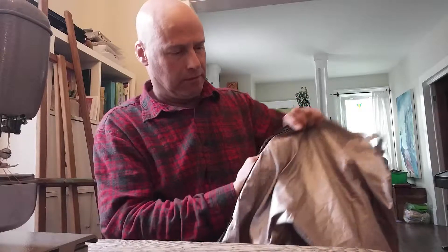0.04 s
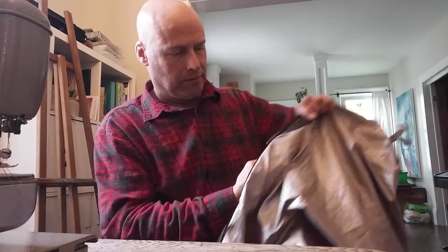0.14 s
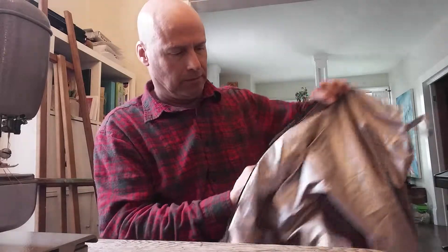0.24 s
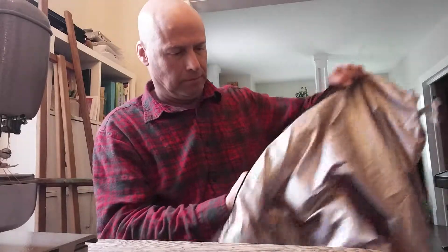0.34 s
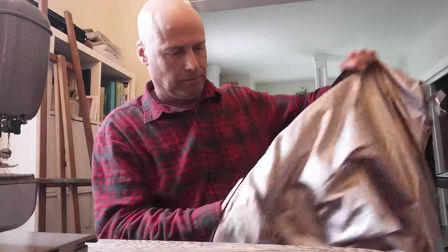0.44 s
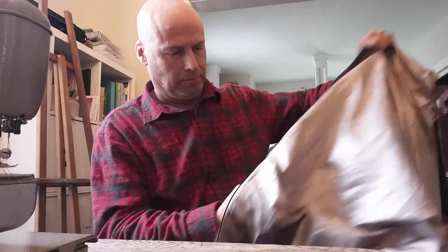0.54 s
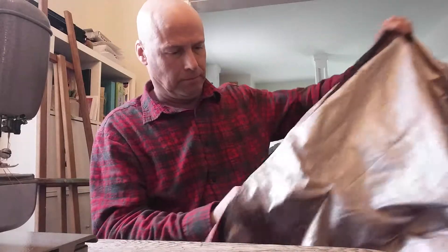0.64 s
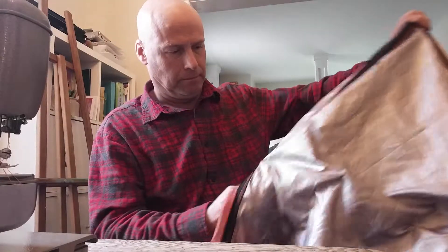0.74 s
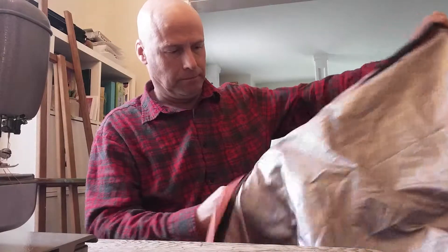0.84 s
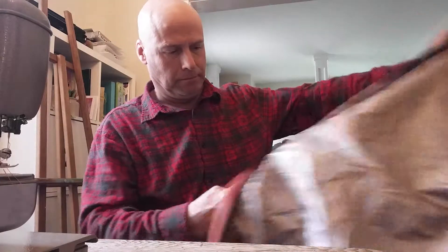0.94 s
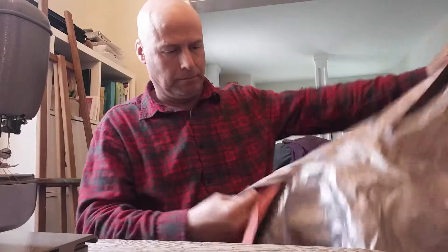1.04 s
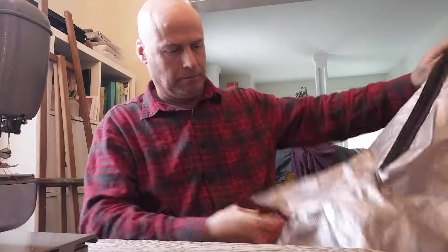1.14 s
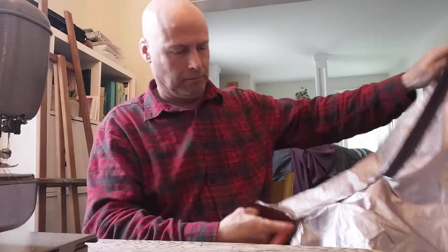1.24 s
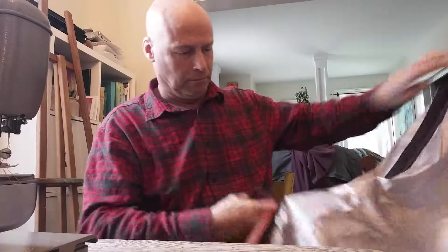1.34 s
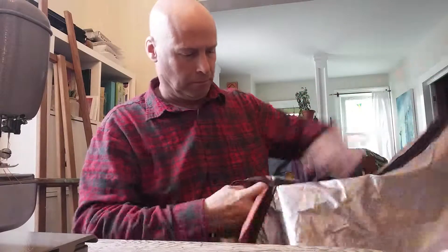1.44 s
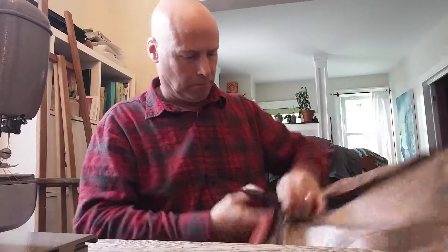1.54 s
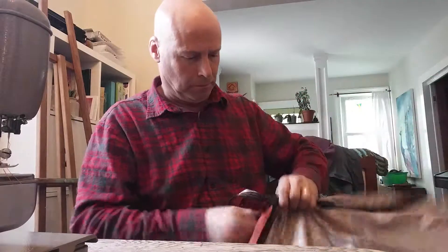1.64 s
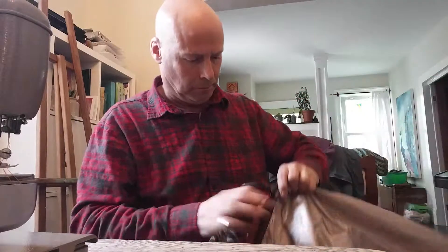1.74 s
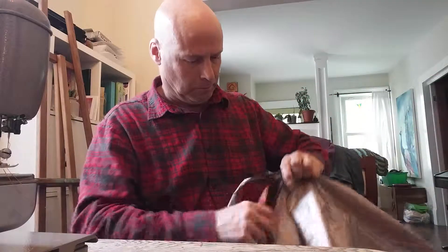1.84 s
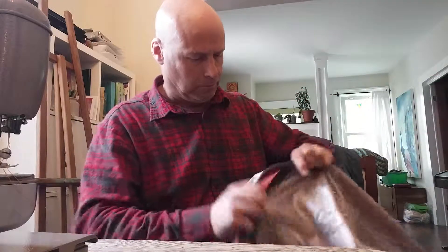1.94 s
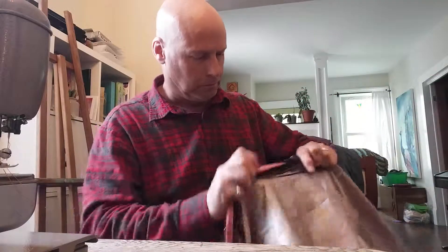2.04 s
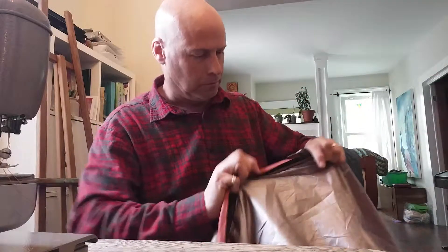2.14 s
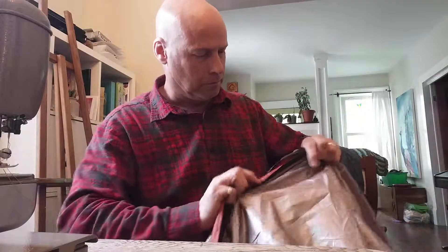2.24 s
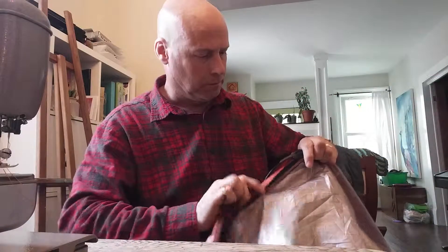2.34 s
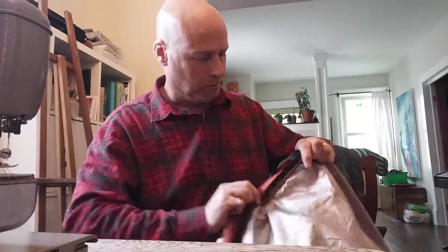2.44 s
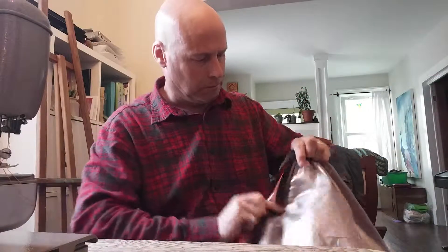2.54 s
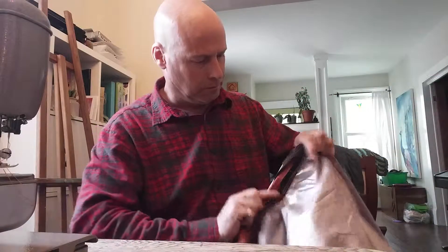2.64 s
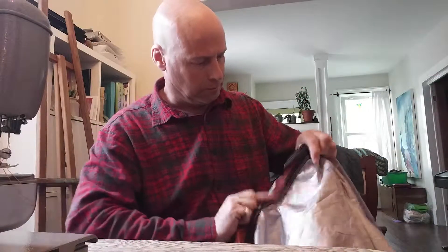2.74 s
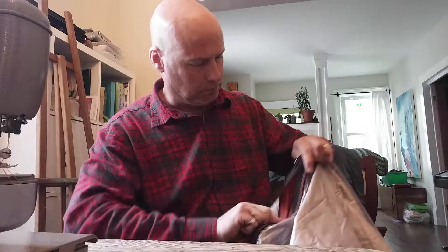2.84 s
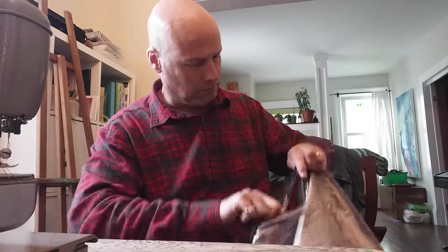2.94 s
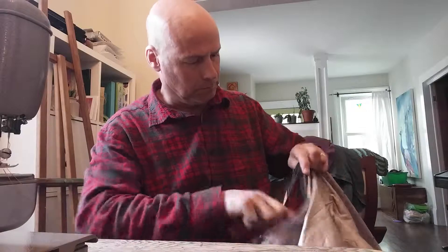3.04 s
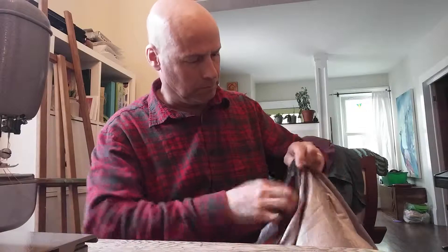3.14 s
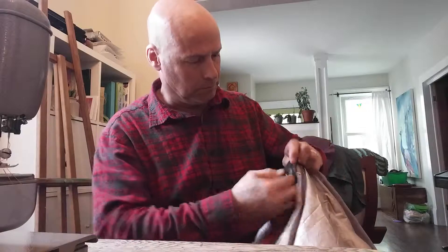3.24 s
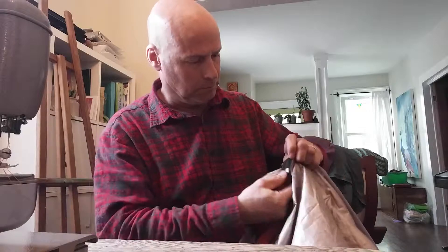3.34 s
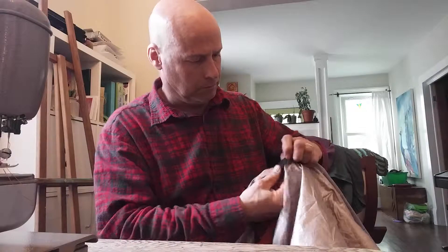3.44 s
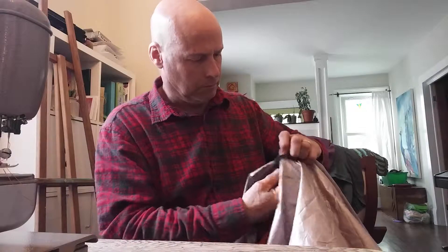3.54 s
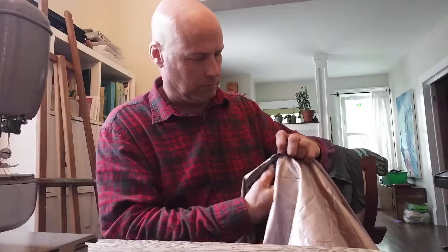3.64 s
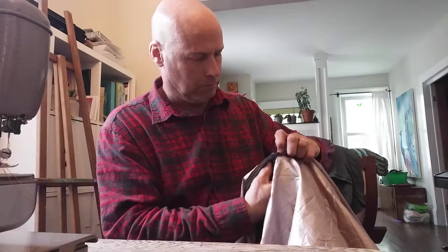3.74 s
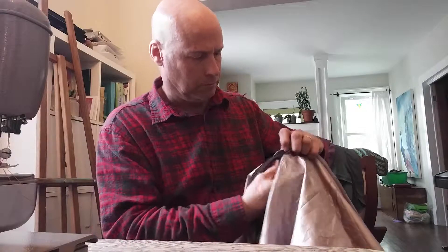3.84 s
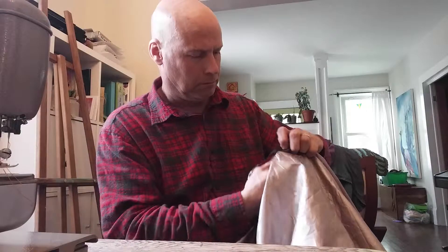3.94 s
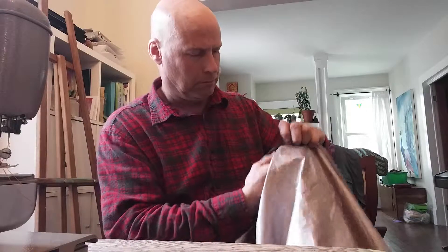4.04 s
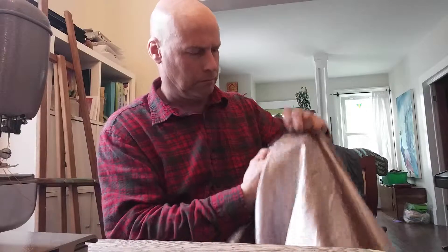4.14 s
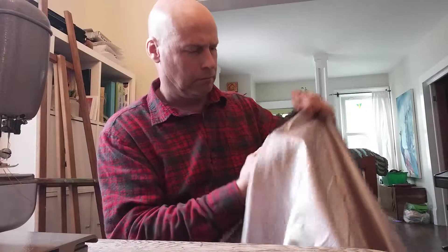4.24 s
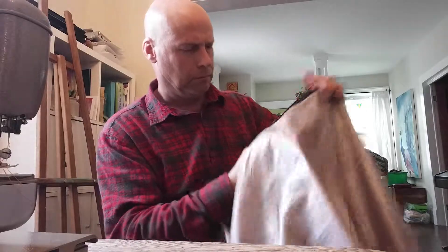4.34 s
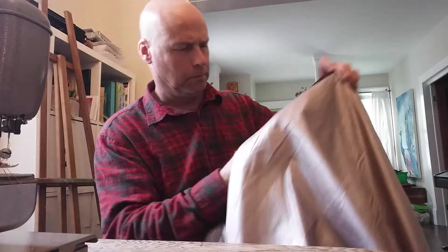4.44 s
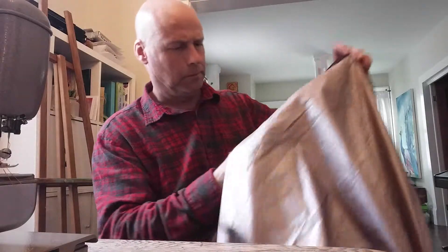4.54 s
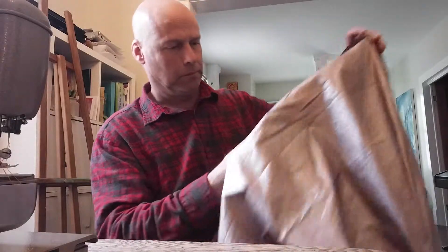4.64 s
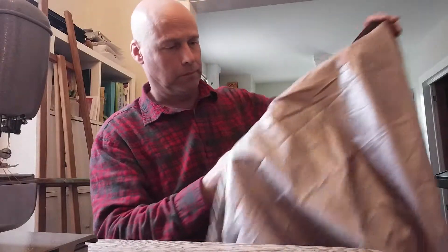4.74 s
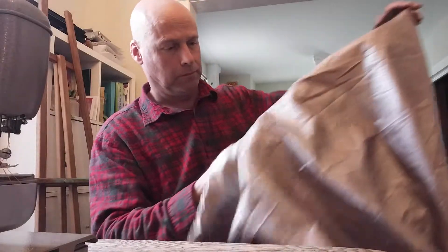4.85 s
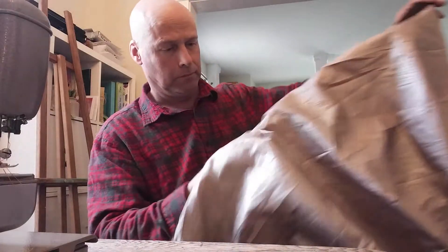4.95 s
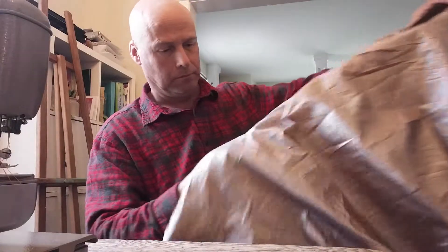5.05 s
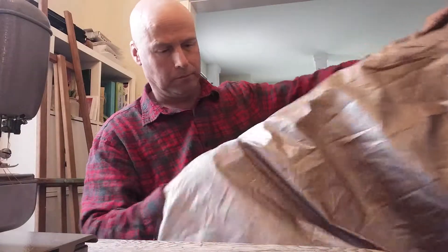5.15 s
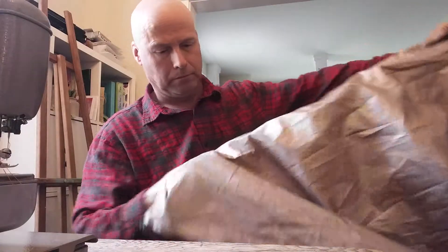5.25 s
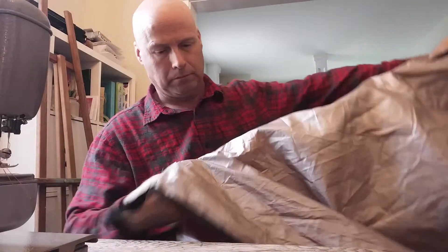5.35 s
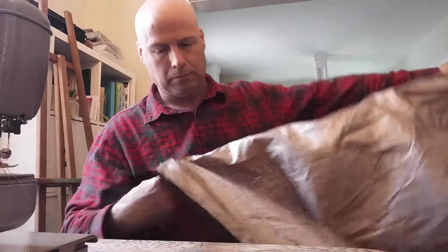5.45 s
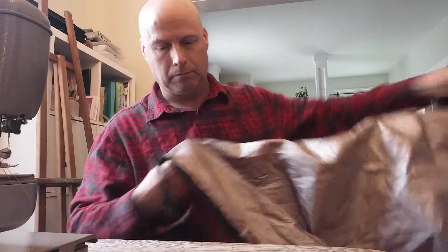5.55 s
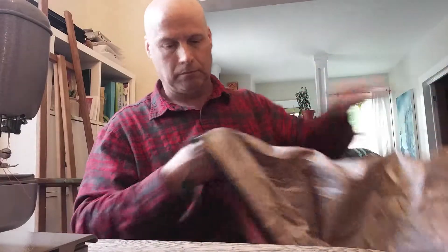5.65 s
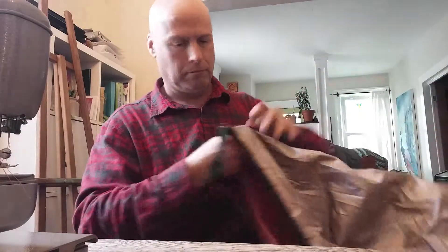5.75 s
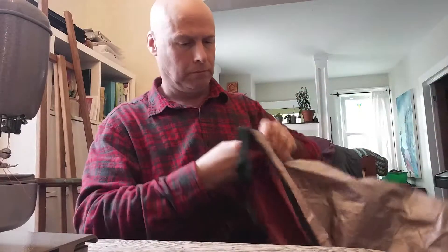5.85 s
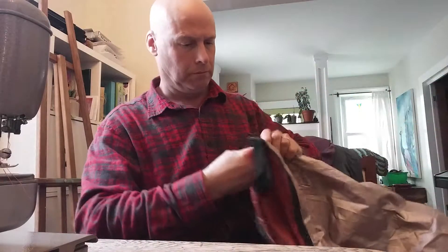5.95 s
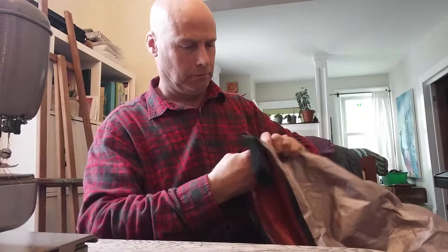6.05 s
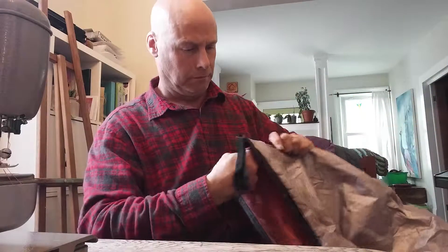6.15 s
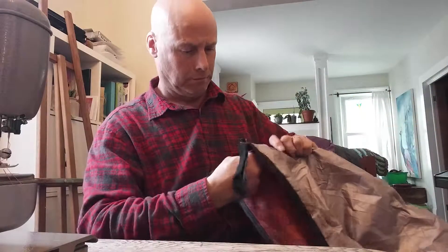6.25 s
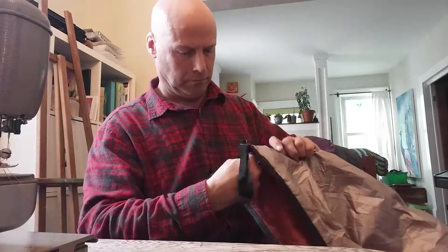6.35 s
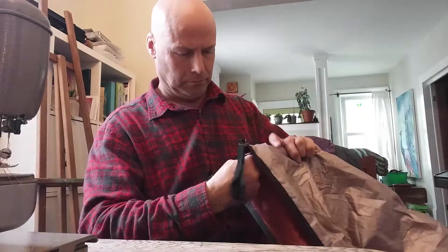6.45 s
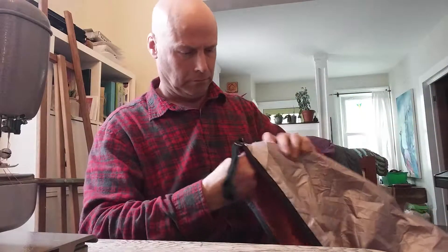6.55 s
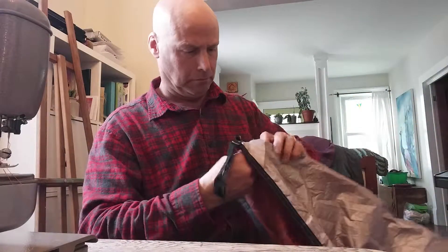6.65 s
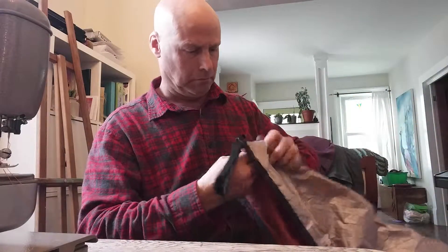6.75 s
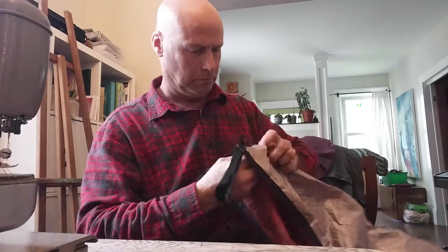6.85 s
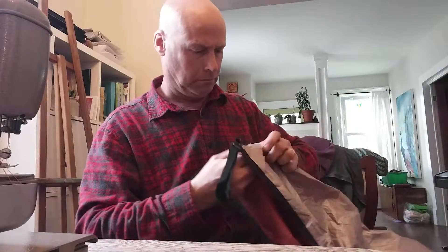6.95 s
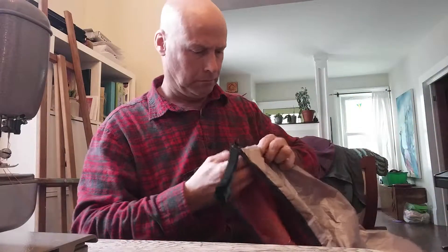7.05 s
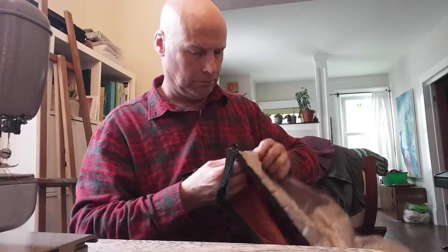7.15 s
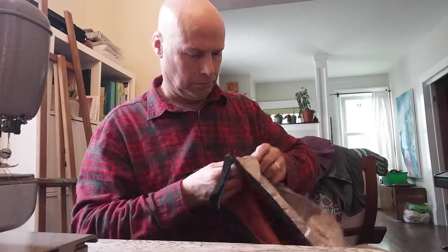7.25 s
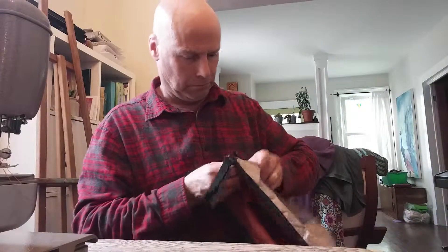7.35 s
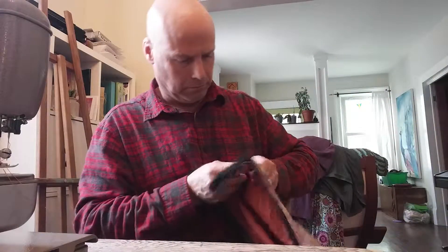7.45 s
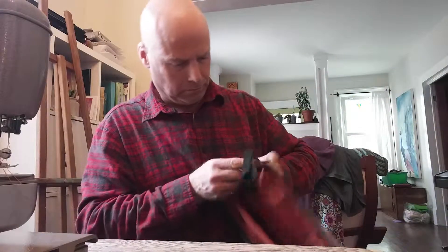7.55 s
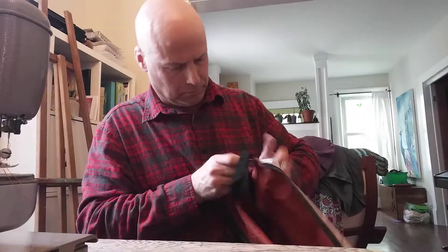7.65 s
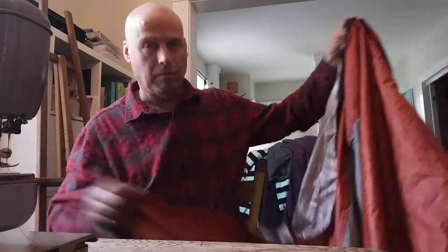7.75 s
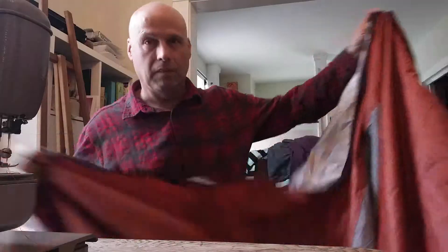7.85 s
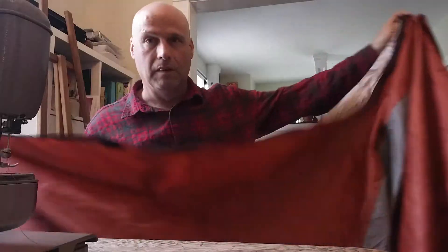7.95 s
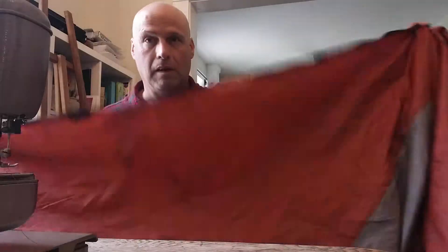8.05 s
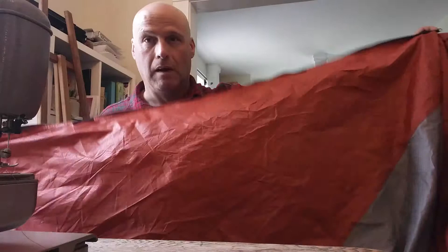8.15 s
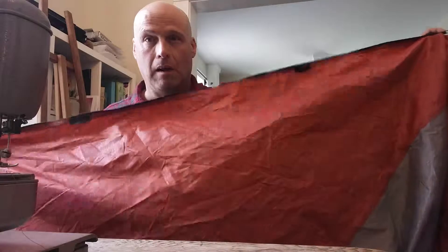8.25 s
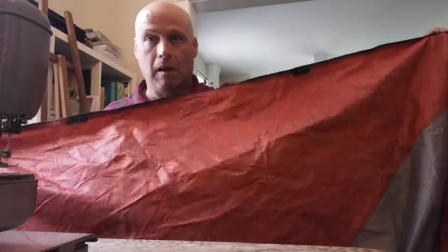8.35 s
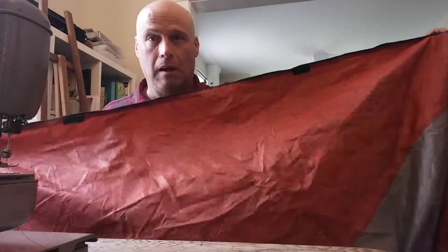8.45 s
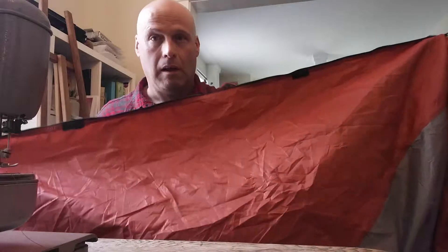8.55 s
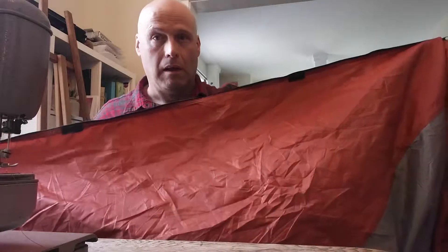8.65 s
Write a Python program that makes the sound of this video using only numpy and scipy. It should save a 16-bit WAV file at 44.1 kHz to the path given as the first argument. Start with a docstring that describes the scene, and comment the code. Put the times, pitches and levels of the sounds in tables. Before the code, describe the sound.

A zipper on a nylon tent fly is dragged twice with a raspy, wavering buzz, amid crisp rustling and flapping fabric in a quiet room.

```python
"""In a quiet room, a hand drags a zipper slider along the coil of a nylon tent fly twice.
The zipper is a harmonic buzz at the rate of passing teeth; popping creases are damped modes.
The sheet's hiss, flapping and air pushes are coloured noise, partly shared by two microphone ports.
Near the end the sound is muted for half a second and fades back in."""
import sys
import numpy as np
from scipy import signal
from scipy.fft import rfft, irfft, next_fast_len
from scipy.io import wavfile
from scipy.ndimage import uniform_filter1d

SR = 44100
rng = np.random.default_rng(int(sys.argv[2]) if len(sys.argv) > 2 else 0)


def to_wav(s):
    """Save 16-bit WAV."""
    ch = np.atleast_2d(s).T  # columns
    pcm = np.round(np.clip(ch, -1, 1) * 32767)  # PCM
    wavfile.write(sys.argv[1], SR, pcm.astype(np.int16))


def level_to_linear(level):
    """Convert decibel levels to linear amplitude factors, elementwise."""
    exponent = np.asarray(level, float) / 20
    return 10 ** exponent


N = 383669
SIZE = 2 * next_fast_len(N // 2 + 1)  # length of the long transforms [samples]


def zipper():
    """Periodic impacts: teeth pass at a rate set by hand speed; uneven teeth blur and shake the buzz."""
    # one list a pull: (time [s], teeth passed [Hz], second partial [relative dB], first over second [dB])
    pulls = [
        [(0.33, 281, -65, -5.5), (0.378, 311, -45, -9.5), (0.45, 420.7, -33, -7), (0.502, 430.5, -31.5, -10.5),
         (0.548, 388.6, -39, -4.5), (0.628, 397.7, -33.5, -14.5), (0.66, 403.5, -35.5, -3),
         (0.716, 566, -30, -5), (0.755, 565.4, -39, 6), (0.792, 472, -36.5, -2), (0.822, 448, -34.5, -7.5),
         (0.92, 317, -33.5, -17), (0.956, 345, -45, 12), (0.98, 354, -31, -26.5), (1.038, 319.8, -33.5, -10.5),
         (1.088, 448.6, -33, -10), (1.16, 371, -68, -12.5)],
        [(4.33, 159.7, -69, 8.5), (4.446, 308.2, -40, -7.5), (4.516, 371, -37.5, 0), (4.6, 395.8, -33.5, -6),
         (4.626, 444.3, -32, -17.5), (4.71, 459, -30.5, -10.5), (4.742, 479, -40, -1.5),
         (4.792, 413, -32.5, -12), (4.848, 457, -34.5, -9.5), (4.896, 412.4, -43, 4), (4.97, 473, -36.5, 3.5),
         (4.995, 523, -33.5, 1.5), (5.056, 563, -38.5, 2.5), (5.206, 433.6, -32, -6.5), (5.268, 479, -39, 4.5),
         (5.324, 423.4, -31.5, -7), (5.364, 490.7, -37.5, 6), (5.438, 414.5, -35.5, -1), (5.476, 453, -43.5, 2),
         (5.548, 470, -29.5, -2), (5.59, 321.3, -35.5, -10.5), (5.66, 255.8, -45, -2)],
    ]
    # higher partials of a tooth click: (multiple of the tooth rate, level against the second [dB])
    tooth_partials = [(3, -13), (4, -28), (5, -35)]
    # changing level of those higher partials: (time [s], added level [dB])
    upper_levels = [(0.36, -2), (0.45, 3.5), (0.55, 9), (0.64, -9), (0.74, 11), (0.82, 5), (0.95, 7.5),
                    (1.09, 1), (4.45, 6), (4.62, -3), (4.75, 0), (4.85, -5.5), (4.98, -3.5), (5.06, 6.5),
                    (5.2, 5.5), (5.3, -4), (5.42, 7.5), (5.58, -2.5)]
    # thin squeak at the sixth partial as the second pull gathers speed: (time [s], relative level [dB])
    squeak_levels = [(4.34, -59), (4.38, -58), (4.46, -49.5), (4.52, -46.5), (4.55, -60), (4.59, -60)]
    t = np.arange(N) / SR
    rows = np.vstack(pulls)
    rate_hz, level_db, first_db = (np.interp(t, rows[:, 0], rows[:, k]) for k in range(1, 4))
    wobble = evened(uniform_filter1d(rng.standard_normal(N), size=300))
    turns = np.cumsum(rate_hz * (1 + .016 * wobble)) / SR  # teeth passed so far
    upper_db = np.interp(t, *np.transpose(upper_levels))
    partials = [(1, level_db + first_db), (2, level_db)]
    partials += [(round(k), level_db + upper_db + db) for k, db in tooth_partials]
    buzz = np.zeros(N)
    for k, db in partials:
        # the slower flutter deepens with the partial number
        level = level_to_linear(db) * flutter(0.0052, 2.0) * flutter(.02, k)
        buzz += level * np.cos(2 * np.pi * k * turns)
    squeak_db = np.interp(t, *np.transpose(squeak_levels), -120, -120)
    buzz += level_to_linear(squeak_db) * np.cos(2 * np.pi * 6 * turns)
    moving = sum((t > pull[0][0]) & (t < pull[-1][0]) for pull in pulls)
    return np.sqrt(2) * buzz * uniform_filter1d(moving * 1., size=1500)


def snaps():
    """Impulse response of damped modes: each popping crease rings them for a cycle or two."""
    # pops: (time [s], relative peak [dB], brightest at [Hz], fall-off away from it [dB per octave])
    pops = [(0.0325, -30, 5500, 8), (0.73, -17, 5500, 10), (0.9899, -21.5, 7000, 11),
            (1.7133, -32, 4200, 10), (1.861, -29, 2600, 9), (1.9461, -28.5, 780, 5.5),
            (2.0561, -27.5, 1000, 14), (2.1665, -25.5, 1900, 16), (2.1887, -38, 3500, 0),
            (2.358, -34.5, 1900, 14), (2.532, -34, 2500, 2), (2.551, -32.5, 900, 3), (2.587, -28, 5500, 5),
            (2.6096, -25, 5500, 14), (3.0273, -34, 1000, 3), (3.3904, -43, 2800, -1.5),
            (3.414, -35, 3500, 8), (3.532, -34.5, 1500, -1), (3.6453, -25.5, 4400, 6.5),
            (4.991, -11, 5500, 30.5), (5.003, -26, 1900, 12.5), (5.6356, -21.5, 7000, 17),
            (5.6839, -19, 8000, 2), (5.7515, -27, 8000, 17.5), (5.992, -26, 5500, 19),
            (6.0744, -29.5, 780, 9), (6.437, -38.5, 5500, 1), (6.78, -29, 1000, 8),
            (6.8863, -22.5, 5500, 25), (6.921, -37, 780, 6), (6.9451, -32, 1200, 6),
            (6.9534, -28.5, 1900, 6), (6.9647, -31, 8000, 5), (8.6212, -34, 5500, 15)]
    # damped modes of a crease: (frequency [Hz], time to the peak of the ring [s])
    crease_modes = [(780, .0012), (1900, .0005), (3500, .0003), (5500, .00017), (8000, .00012)]
    lead_s, right_delay_s = .0004, 20e-6  # start ahead of the listed time; delay at the right port
    out, t = np.zeros((2, N)), np.arange(600) / SR
    modes = np.array([np.sin(2 * np.pi * hz * t) * t / peak * np.exp(1 - t / peak)
                      for hz, peak in crease_modes])
    mode_hz = np.array(crease_modes)[:, 0]
    for s, db, bright_hz, fall_db in pops:
        mode_db = db - fall_db * abs(np.log2(mode_hz / bright_hz))
        for port, at in zip(out, (s, s + right_delay_s)):
            port[round((at - lead_s) * SR):][:len(t)] += level_to_linear(mode_db) @ modes
    return out


def sliding_hiss():
    """Friction noise: sliding nylon excites a broad band, with jumps where a fold lets go."""
    # colour of the hiss: (frequency [Hz], relative density [dB per Hz])
    hiss_colour = [(300, -16), (800, -9.5), (1500, -1.5), (3000, 0), (5000, 0.5), (7000, 3.5),
                   (10000, -4.5), (13000, -11.5), (16000, -14.5)]
    # a fold lets go: (time [s], jump [dB], time for the jump to die by 1/e [s])
    scrapes = [(1.168, 3, 0.026), (2.584, 6.5, 0.012), (2.905, 4.5, 0.0075), (5.991, 3.5, 0.043),
               (6.074, 5, 0.012)]
    t = np.arange(N) / SR
    scrape_db = sum(db * (t > s) * np.exp(-abs(t - s) / decay) for s, db, decay in scrapes)
    slide = grainy(500, 5.8, 0.14) * handling(1) * level_to_linear(scrape_db) * flutter(0.0029, 0.55)
    return patchy(spread(slide, hiss_colour, 3200, 12000), 1.4)


def taut_drumming(flap):
    """Membrane tension raises pitch: noise centred near 650 Hz follows the flapping."""
    # colour of the taut parts: (frequency [Hz], relative density [dB per Hz])
    taut_colour = [(350, -28), (520, -0.5), (650, 3), (950, -3), (1400, -8), (2200, -11), (4000, -29.5)]
    taut = grainy(160, 5.1, 0.28) * flap * flutter(0.025, 1.8)
    return spread(taut, taut_colour, 560, 800)


def slack_drumming(flap, puffs):
    """Low tension lowers pitch: noise centred near 380 Hz follows flapping and swings."""
    # colour of the slack parts: (frequency [Hz], relative density [dB per Hz])
    slack_colour = [(70, -36), (150, -14), (260, -5), (380, 3), (500, -9), (700, -47.5)]
    # slack against taut parts, as the sheet hangs or is stretched: (time [s], level [dB])
    slackness = [(0.1, -2), (0.5, -11.5), (1.2, -6), (1.75, -2), (2.2, -5.5), (3.2, -4), (4.2, -4.5),
                 (4.75, -6), (5.2, -8), (6, -3), (6.6, -4.5), (7.3, -4.5), (7.7, -8.5), (8.5, -0.5)]
    puff_slack_db = 1.5  # a swing also shakes the slack parts
    slack_db = np.interp(np.arange(N) / SR, *np.transpose(slackness))
    sway = np.sqrt(level_to_linear(2 * slack_db) * flap ** 2 + level_to_linear(2 * puff_slack_db) * puffs)
    slack = grainy(90, 2.9, 0.14) * sway * flutter(0.018, 1.3)
    return spread(slack, slack_colour, 250, 380)


def pushed_air(flap, puffs):
    """Near-field air displacement: the swinging sheet pushes low rumble at the microphone."""
    # colour of the rumble: (frequency [Hz], relative density [dB per Hz])
    rumble_colour = [(25, -13.5), (45, -3), (70, 2), (130, -1), (220, 0), (400, -33.5)]
    air_db, calm_db = -62.5, -52  # air level when the flapping stands at its calm level
    follows = 0.11  # dB of air per dB of flapping
    push = np.sqrt(level_to_linear(2 * air_db) * (flap / level_to_linear(calm_db)) ** (2 * follows) + puffs)
    air = rng.standard_normal((3, N)) * push * flutter(0.03, 1.2)
    return spread(air, rumble_colour, 40, 200)


def fabric():
    """Superposition of friction, membrane and air noise, driven by shared handling gains."""
    # the sheet swings: (time of the peak [s], length [s], relative level [dB])
    swings = [(0.6, 0.029, -66), (0.993, 0.028, -72.5), (1.14, 0.031, -50), (1.25, 0.054, -59),
              (1.726, 0.059, -48.5), (2.19, 0.044, -55), (3.028, 0.045, -65), (3.562, .04, -65),
              (4.7, 0.078, -53), (5.16, 0.077, -48.5), (5.48, 0.035, -53.5), (5.67, .05, -56.5),
              (5.98, 0.19, -59.5), (6.41, 0.12, -59), (6.92, 0.023, -62)]
    flap, puffs = handling(2), swells(swings, column=2)
    return sliding_hiss() + taut_drumming(flap) + slack_drumming(flap, puffs) + pushed_air(flap, puffs)


def handling(column):
    """Power addition: gain of hiss (1) or flapping (2) from slow stir plus separate rustles."""
    # the sheet is never still: (time [s], sliding hiss [relative dB], flapping [relative dB])
    stir = [(0, -43.5, -54), (0.1, -57, -61.5), (0.21, -49.5, -43.5), (0.43, -37, -42.5), (0.7, -35.5, -43),
            (1.07, -37, -37.5), (1.145, -39.5, -44.5), (1.25, -41, -44), (1.36, -49, -50),
            (1.68, -56.5, -57.5), (1.9, -55, -45.5), (2.02, -54, -53), (2.3, -46.5, -48),
            (2.48, -50, -54.5), (2.7, -52, -51), (3.3, -48, -53.5), (3.98, -52, -57), (4.23, -52.5, -58.5),
            (4.36, -42.5, -43.5), (4.6, -36, -41), (5.5, -36.5, -40), (5.8, -44.5, -43.5),
            (6.23, -46.5, -49), (6.51, -55, -57), (7.2, -48.5, -54.5), (7.55, -50, -53.5),
            (7.8, -40.5, -47.5), (8.35, -59, -56.5), (8.7, -57, -58.5)]
    # a fold dragged or shaken: (peak time [s], length [s], hiss [relative dB], flapping [relative dB])
    rustles = [(0.033, 0.022, -48, -55.5), (0.604, 0.044, -86.5, -38), (0.738, .04, -38, -44.5),
               (0.925, 0.046, -34.5, -46), (1.06, 0.029, -42.5, -41), (1.112, 0.017, -34.5, -36),
               (1.185, 0.039, -37, -56.5), (1.616, 0.089, -50.5, -48.5), (1.726, 0.044, -37.5, -38.5),
               (1.821, 0.13, -38.5, -46), (2.075, 0.038, -45.5, -43), (2.175, 0.073, -39, -40.5),
               (2.415, 0.03, -47.5, -58), (2.54, 0.02, -45, -47), (2.599, 0.056, -43, -47),
               (2.68, 0.098, -52, -53.5), (2.784, .04, -44.5, -54), (2.908, .035, -42.5, -57.5),
               (3.028, 0.039, -44.5, -46), (3.163, .09, -46, -62), (3.422, 0.019, -51, -51.5),
               (3.562, 0.073, -43.5, -46.5), (3.697, .06, -47, -55.5), (3.821, 0.064, -49.5, -57.5),
               (4.026, 0.039, -46, -60.5), (4.166, 0.036, -61, -52.5), (4.5, 0.042, -64, -41.5),
               (5.004, 0.051, -36, -47.5), (5.198, 0.026, -34, -38), (5.288, .03, -37, -50.5),
               (5.607, 0.026, -39.5, -39), (5.692, 0.037, -42.5, -45.5), (5.996, 0.087, -44.5, -50),
               (6.101, 0.056, -40.5, -45.5), (6.356, 0.061, -41.5, -48.5), (6.55, 0.042, -52, -59),
               (6.69, 0.076, -49, -60.5), (6.785, 0.052, -44.5, -53.5), (6.86, 0.017, -60, -58),
               (6.949, 0.038, -47, -51.5), (7.049, 0.036, -44.5, -48), (7.268, 0.024, -48, -58),
               (7.433, 0.069, -46.5, -48), (7.608, 0.066, -44.5, -50.5), (7.717, 0.054, -40.5, -48),
               (8.66, 0.039, -49.5, -67)]
    stir_db = np.interp(np.arange(N) / SR, *np.transpose(stir)[[0, column]])
    return np.sqrt(level_to_linear(2 * stir_db) + swells(rustles, column=column + 1))


def swells(rows, column):
    """Gaussian power envelopes: events rise quickly to their peak and die more slowly."""
    rise_share = 0.65  # rise time against the length, over which the amplitude dies by 1/e
    power = np.zeros(N)
    for row in rows:
        peak_s, length_s = row[:2]
        start = max(round((peak_s - 3 * length_s) * SR), 0)
        stop = min(round((peak_s + 4 * length_s) * SR), N)
        at = np.arange(start, stop)
        u = (at / SR - peak_s) / length_s
        power[at] += level_to_linear(2 * row[column]) * np.exp(-2 * np.where(u < 0, u / rise_share, u) ** 2)
    return power


def grainy(per_s, spread_db, share):
    """Shot noise: sparse creases of uneven size over many fibres, in four unrelated streams."""
    size = level_to_linear(spread_db * np.minimum(rng.exponential(1, (4, N)), 3.6))
    size = size * rng.choice([-1., 1.], (4, N))
    creases = size * (rng.random((4, N)) < per_s / SR)
    share = np.clip(share, 0, 1)  # part of the power in creases
    return np.sqrt(1 - share) * rng.standard_normal((4, N)) + np.sqrt(share) * evened(creases)


def flutter(seconds, db):
    """Amplitude modulation: random quick wavering of level around an unchanged mean power."""
    width = int(seconds * SR)
    smooth = uniform_filter1d(uniform_filter1d(rng.standard_normal(N), width), width)
    return evened(level_to_linear(db * evened(smooth)))


def patchy(x, db):
    """Time-varying spectrum: different folds speak in random patches of louder and softer colour."""
    z = signal.stft(x, nperseg=256)[2]
    patches = uniform_filter1d(rng.standard_normal(z.shape[:0:-1]).T, size=14, axis=1)
    patches = evened(uniform_filter1d(patches, size=6, axis=0))
    power_rise_db = db ** 2 * np.log(10) / 20  # taken off to hold the mean power
    return signal.istft(z * level_to_linear(db * patches - power_rise_db), nperseg=256)[1][:, :N]


def spread(streams, colour, lo_hz, hi_hz):
    """Partial coherence: both ports share one coloured stream, and each hears another alone."""
    # likeness of the ports: (frequency [Hz], shared part of the power [0 to 1])
    likeness = [(40, .3), (130, 0.99), (250, 0.76), (400, 0.96), (700, 1), (1200, 0.31), (2200, 0.26),
                (4000, 0.09), (16000, 0.032)]
    right_delay_s = 38e-6  # the sheet is nearer the left port
    hz = np.fft.rfftfreq(SIZE, 1 / SR)
    same = np.clip(read(likeness, hz), 0, 1)
    delays = np.array([[0], [right_delay_s]])
    common = rfft(streams[0], SIZE) * np.exp(-2j * np.pi * hz * delays)
    alone = rfft(streams[1:3], SIZE)
    mixed = common * np.sqrt(same) + alone * np.sqrt(1 - same)
    return irfft(mixed * band_unit(colour, hz, lo_hz, hi_hz), SIZE)[:, :N]


def band_unit(points, hz, lo_hz, hi_hz):
    """Band-power normalisation: gain curve whose unit noise has rms 1 inside lo-hi."""
    gain = level_to_linear(read(points, hz))
    return gain / np.sqrt(np.sum(gain[(hz > lo_hz) & (hz < hi_hz)] ** 2) / len(hz))


def read(points, hz):
    """Logarithmic frequency scale: reads a spectrum table between its points."""
    f, value = np.transpose(points)
    return np.interp(np.log(hz + 1), np.log(f + 1), value)


def evened(x):
    """Power normalisation: scales to rms 1."""
    return x / np.sqrt(np.mean(x ** 2) + 1e-20)


def causal(db):
    """Minimum phase: impulse response for a gain curve [dB] given over rfft bins."""
    log_gain = np.log(level_to_linear(np.r_[db, db[-2:0:-1]]))
    phase = -signal.hilbert(log_gain).imag
    return np.fft.ifft(np.exp(log_gain + 1j * phase)).real[:len(db) // 2]


def room(x, t60_s, db):
    """Diffuse reverberation: sparse random-sign reflections, unlike at each port, treble dying first."""
    taps = np.zeros((2, SR // 2))
    at = np.arange(150, SR // 2 - 20, 20) + rng.integers(0, 20, (2, (SR // 2 - 151) // 20))
    np.put_along_axis(taps, at, rng.choice([-1., 1.], at.shape), 1)
    hz, t, z = signal.stft(taps, SR, nperseg=256)
    decay_db = -60 * t / t60_s * (0.5 + hz[:, None] / 6000)  # t60_s holds at 3 kHz
    tail = signal.istft(z * level_to_linear(decay_db), SR, nperseg=256)[1]
    return level_to_linear(db) * signal.fftconvolve(x[None], tail / np.linalg.norm(tail[0]), axes=1)[:, :N]


def scene():
    """Superposition: near sources with their room echo over the wide rustle of the sheet."""
    buzz, pops = zipper(), snaps()
    near = level_to_linear(3.0) * buzz + level_to_linear(0.5) * pops
    echo = room(buzz, 0.32, -8) + room(pops[0], 0.15, -10.5)
    return near + echo + fabric()


def top_cut(x):
    """Nothing passes above the cut-off."""
    return signal.sosfilt(signal.butter(12, 16800, fs=SR, output="sos"), x)


def record(dry):
    """Linear filtering: port resonances, lag between ports and band limits, then the mute."""
    # housing resonances at each port: (frequency [Hz], width [Hz], gain [dB])
    left_port = [(120, 600, -3), (523, 35, -16.5), (7430, 1000, 5), (7790, 240, -11.5), (8540, 2000, 3.5)]
    right_port = [(121, 160, 0.5), (521.5, 51, -12.5), (799, 690, -1.5), (7300, 130, -19.5),
                  (8640, 3600, -6)]
    # phase lag of the right port: (frequency [Hz], lag [rad])
    right_lag = [(40, 2.26), (300, 0.44), (700, 0.53), (2000, 0.49), (4000, 0.061)]
    low_hz, high_hz = 38, 15850  # band limits
    off_s, on_s, fade_s = 7.8055, 8.338, .045  # mute, return and fade-in time
    hz = np.fft.rfftfreq(8192, 1 / SR)
    port_db = [sum(db / (1 + (2 * (hz - f) / w) ** 2) for f, w, db in port)
               for port in (left_port, right_port)]
    x = signal.oaconvolve(dry, np.array([causal(db) for db in port_db]), axes=1)[:, :N]
    lag = read(right_lag, np.fft.rfftfreq(SIZE, 1 / SR))
    x[1] = irfft(rfft(x[1], SIZE) * np.exp(-1j * lag), SIZE)[:N]
    x = signal.sosfilt(signal.butter(3, low_hz, "high", fs=SR, output="sos"), x)
    x = signal.oaconvolve(x, signal.firwin(401, high_hz, fs=SR)[None], "same")
    t = np.arange(N) / SR
    x *= np.where(t < off_s, 1, np.clip((t - on_s) / fade_s, 0, 1))
    return top_cut(x)


dry = scene()
out = record(dry)
to_wav(out)
```